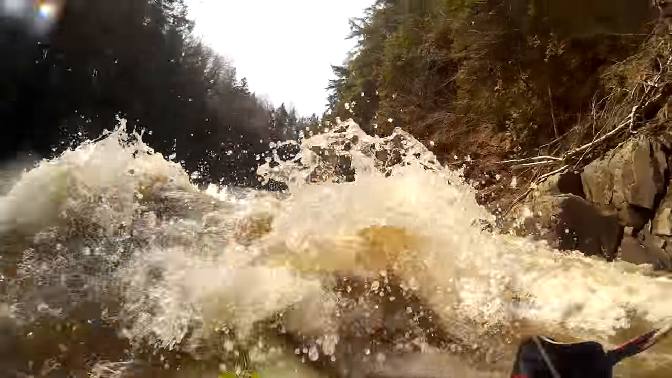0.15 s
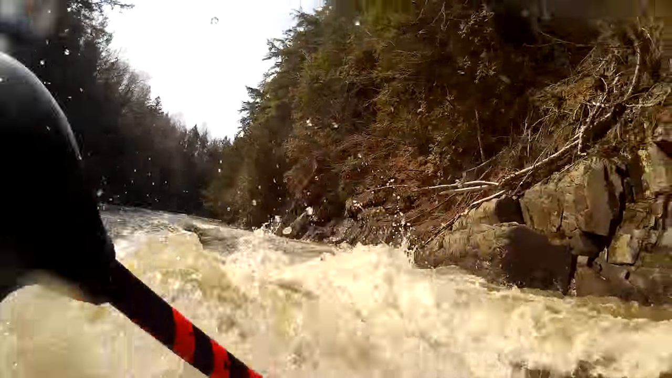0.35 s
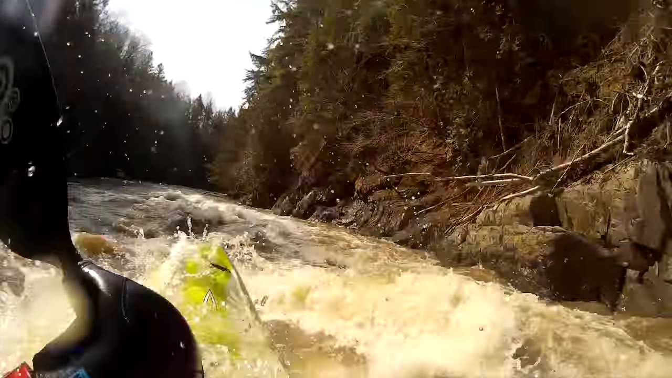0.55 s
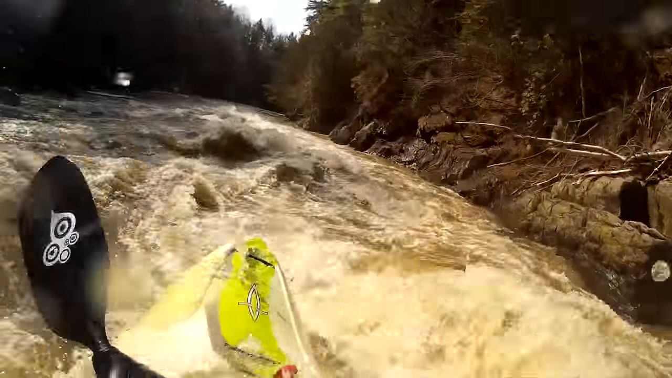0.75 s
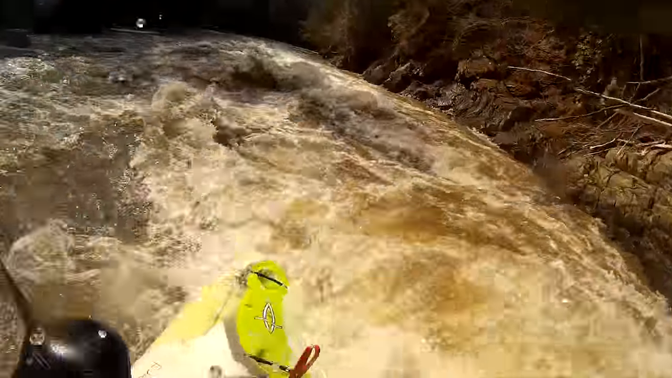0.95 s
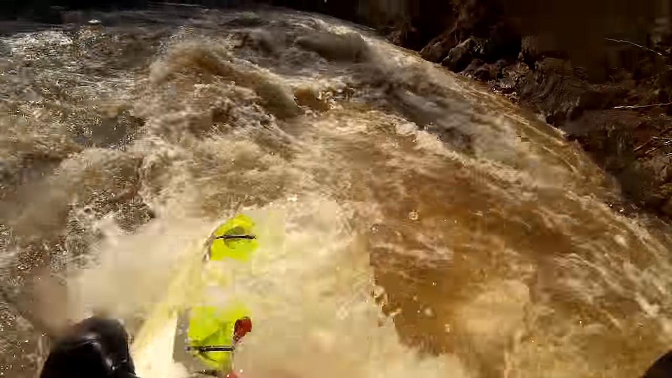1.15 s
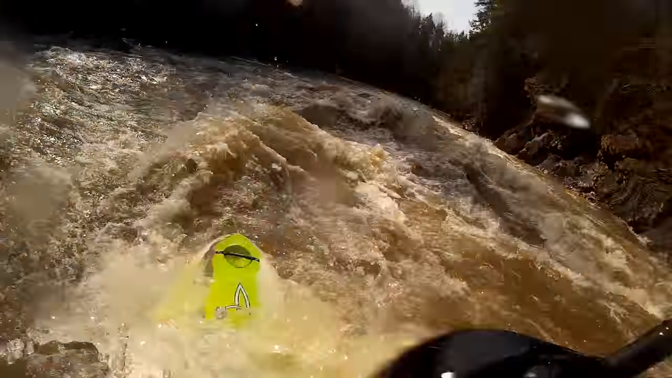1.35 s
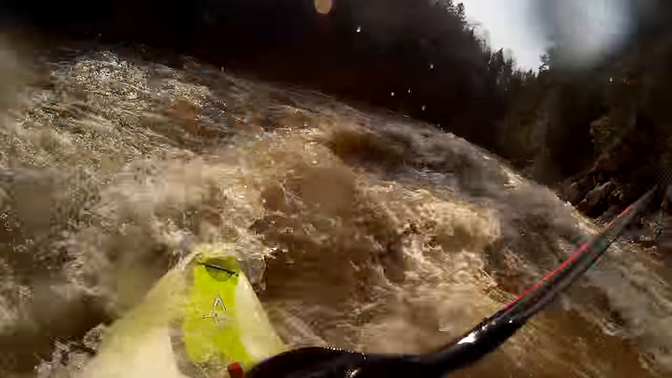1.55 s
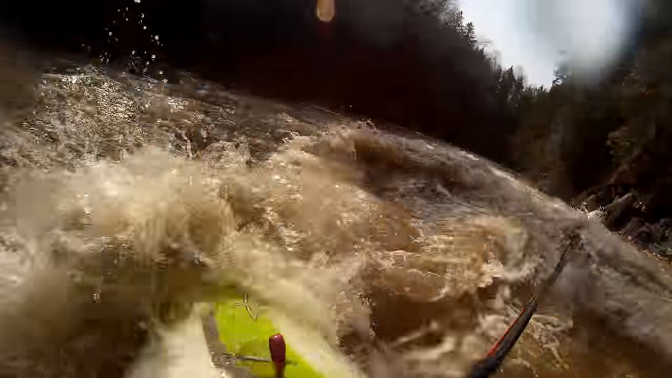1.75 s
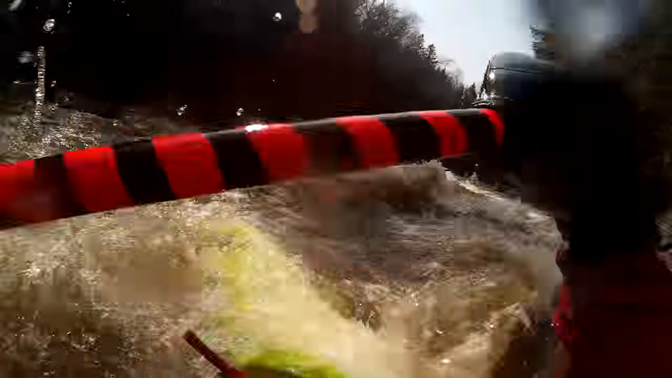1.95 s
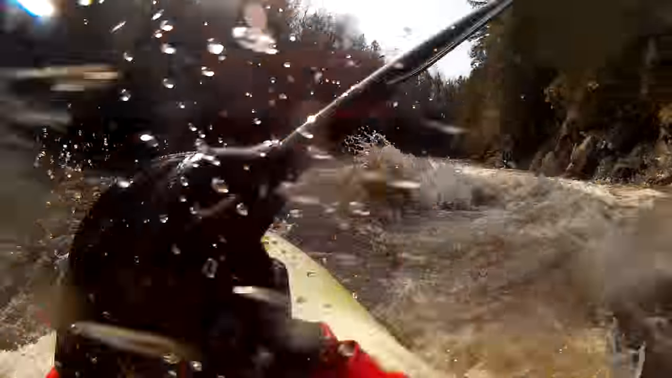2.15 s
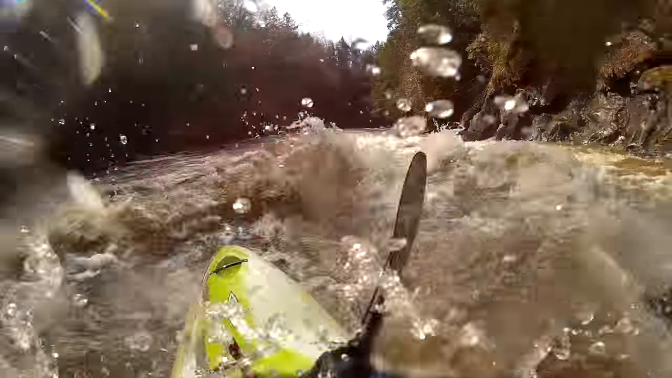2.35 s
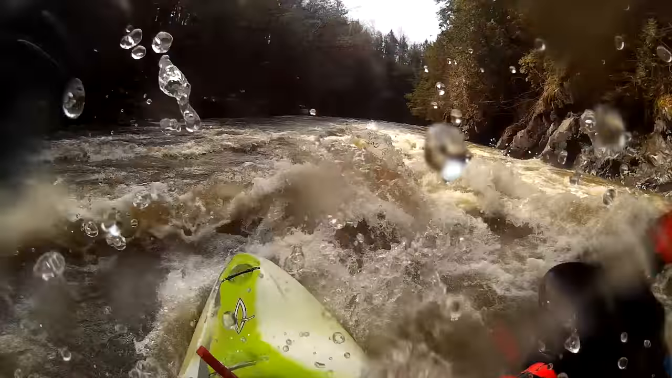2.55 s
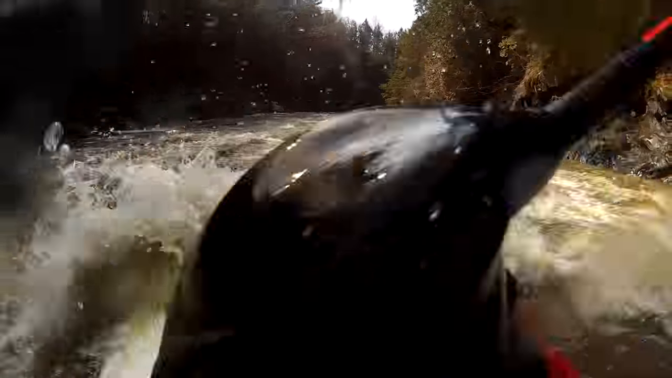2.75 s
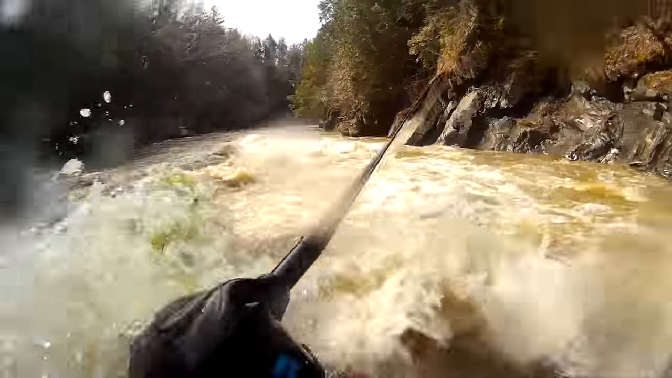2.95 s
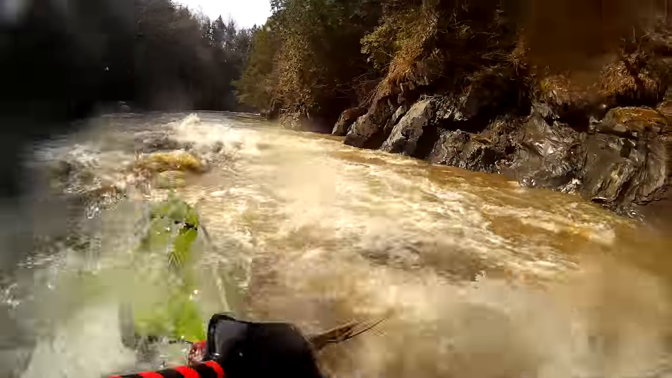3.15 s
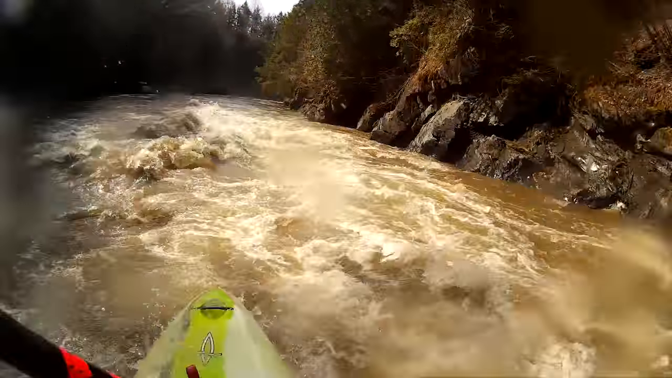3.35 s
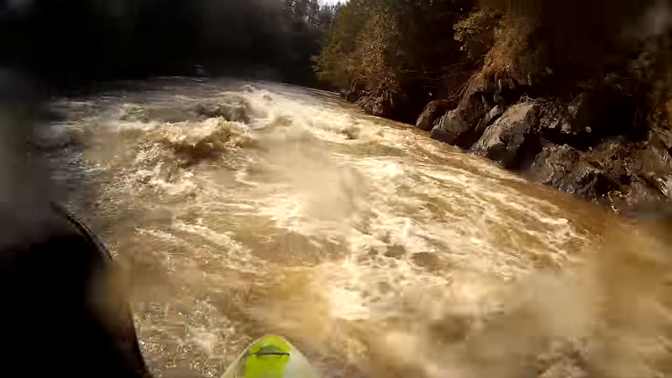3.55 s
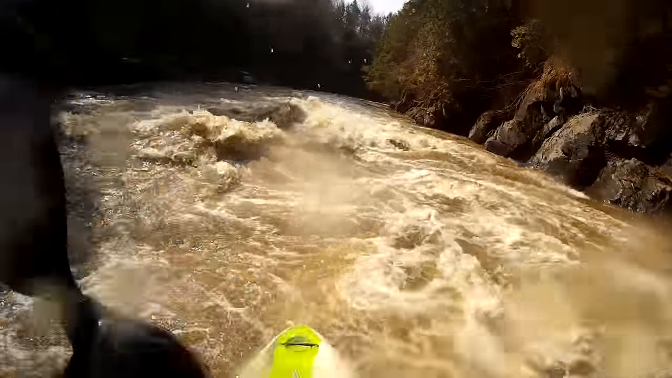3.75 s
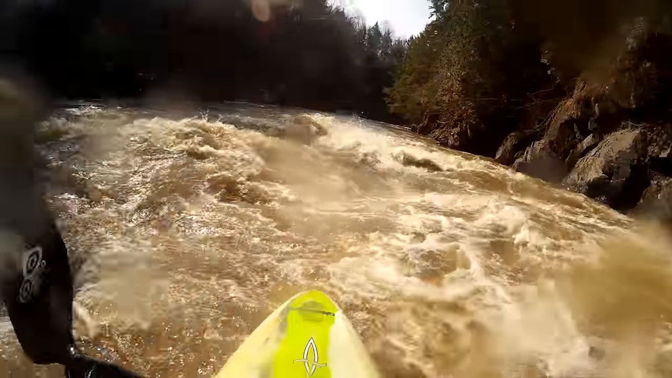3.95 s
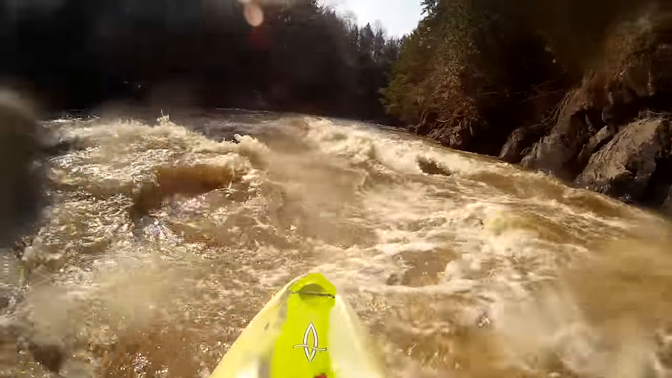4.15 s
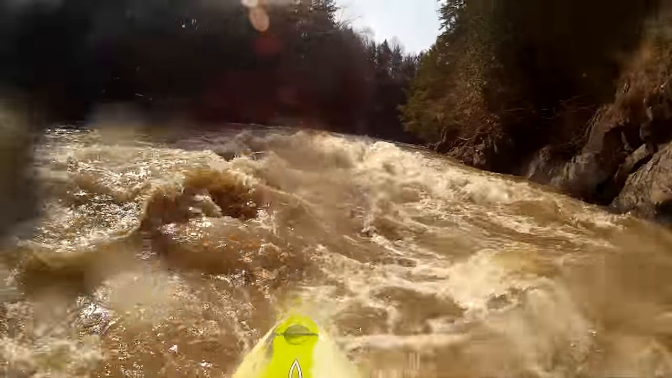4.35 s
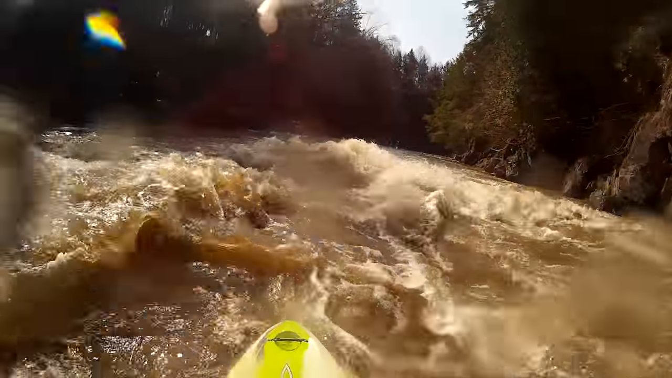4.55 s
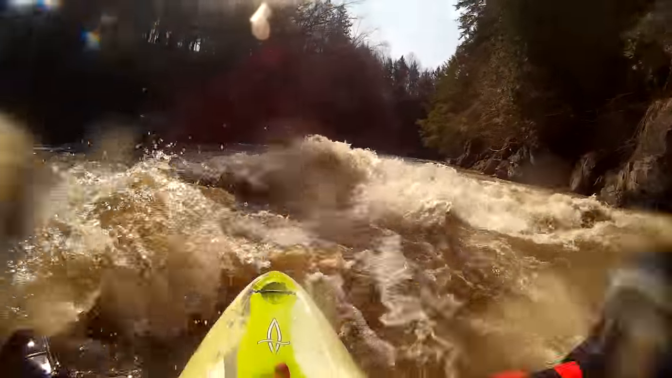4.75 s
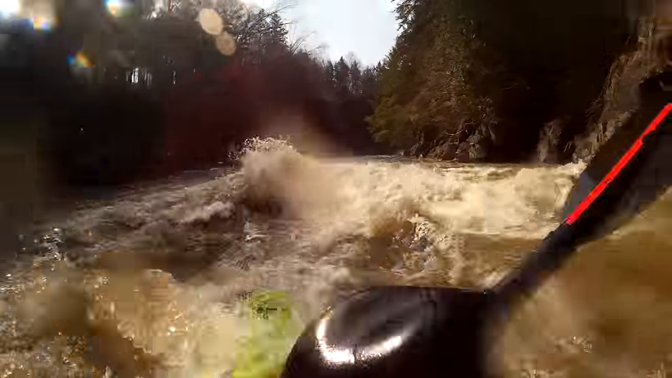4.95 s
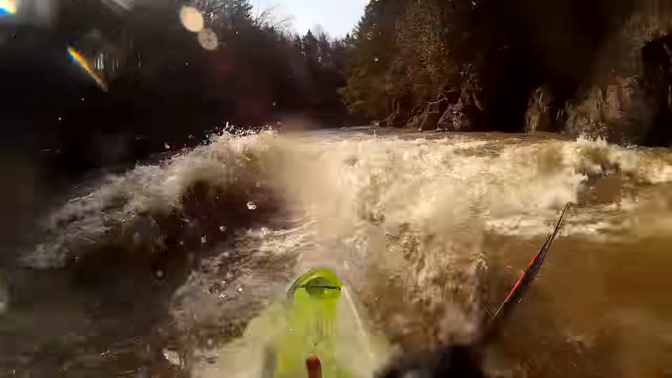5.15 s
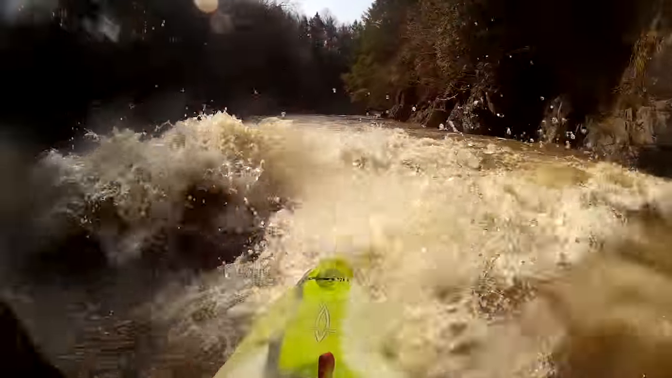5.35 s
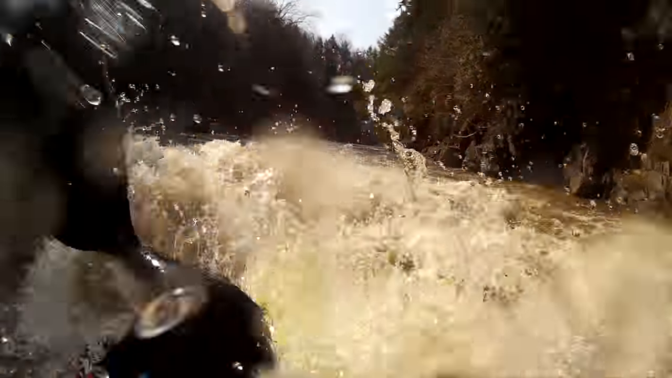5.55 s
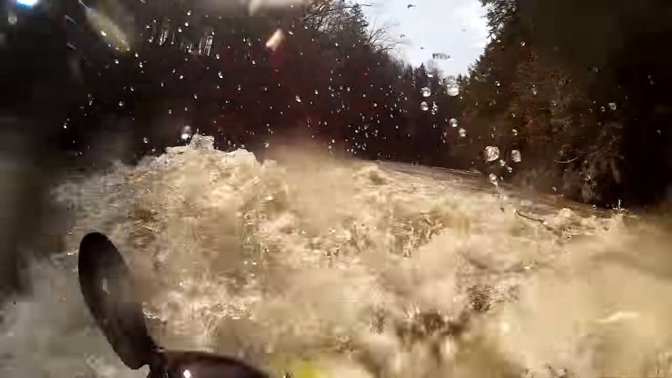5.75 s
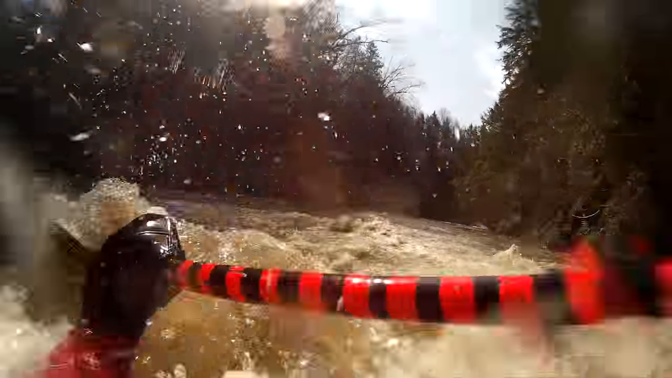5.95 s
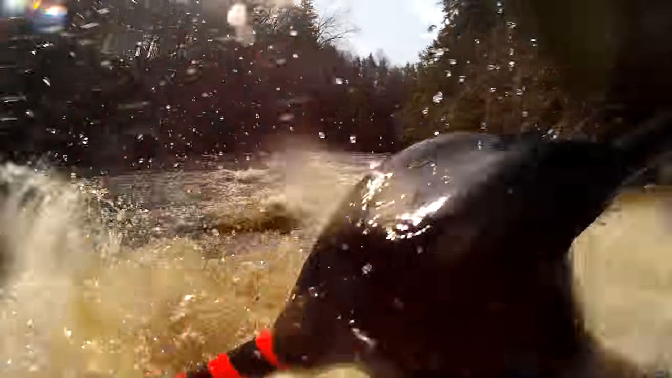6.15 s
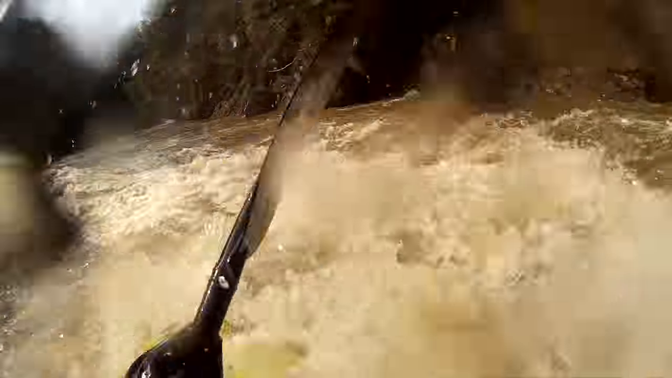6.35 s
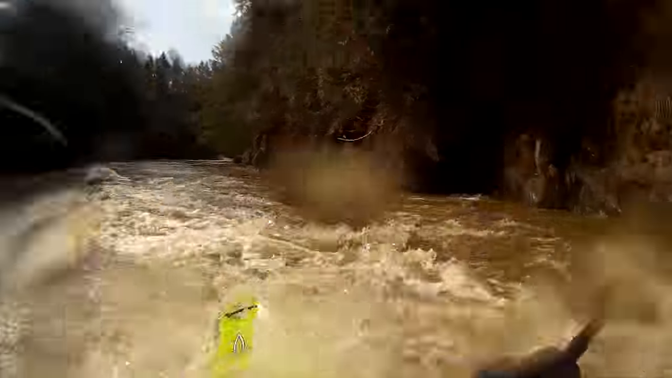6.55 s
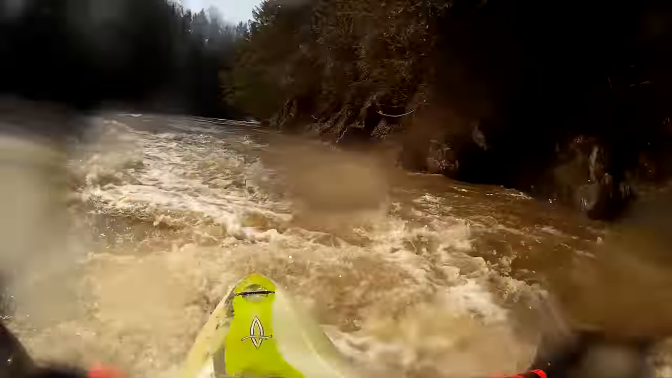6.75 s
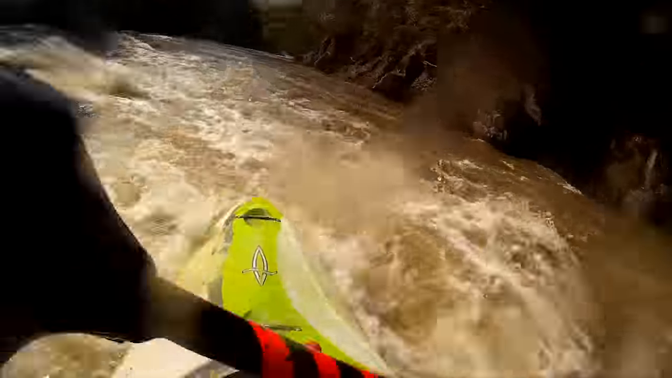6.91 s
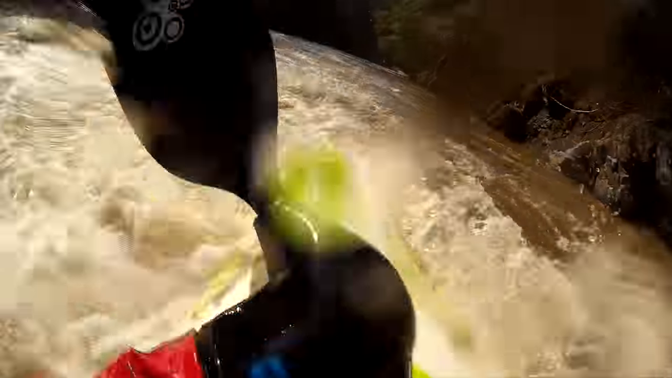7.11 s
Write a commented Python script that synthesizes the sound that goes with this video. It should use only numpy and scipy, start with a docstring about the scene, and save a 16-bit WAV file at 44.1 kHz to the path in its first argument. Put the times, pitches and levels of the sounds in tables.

```python
"""The muffled roar of river rapids, heard inside a sealed camera housing on a paddler's helmet.
Shaped noise makes the roar, spray, slosh, shaking and faint microphone hiss.
The mount creaks and thuds as it slips; knocks ring the housing's modes and push the mount.
Waves jolt helmet and camera into short bounces; drops crack, puff and ping on the shell."""
import sys
import numpy as np
from scipy import signal
from scipy.io import wavfile
from scipy.ndimage import uniform_filter1d

SR = 44100
rng = np.random.default_rng(int(sys.argv[2]) if len(sys.argv) > 2 else 0)


def int16_out(signal):
    """Quantize to a 16-bit WAV file."""
    q = np.round(np.clip(np.atleast_2d(signal).T, -1, 1) * 32767)
    wavfile.write(sys.argv[1], SR, q.astype(np.int16))


def amplitude_ratio(level_db):
    """Convert a level in decibels to the matching linear amplitude (field) ratio."""
    exponent = np.asarray(level_db, float) / 20
    return 10 ** exponent


N = 321048
TIME_S = np.arange(N) / SR


def evened(x):
    """Scales to rms 1."""
    return x / np.sqrt(np.mean(x ** 2) + 1e-20)


def density(points, hz):
    """Power density at hz, from a curve of (frequency [Hz], density [dB per Hz])."""
    f, db = np.transpose(points)
    curve_db = np.interp(np.log(hz + 1), np.log(f + 1), db, left=-80, right=-80)
    return amplitude_ratio(2 * curve_db)


def add(mix, start_s, sound):
    """Adds a sound to the mix at start_s, cut at the end of the mix."""
    part = mix[max(round(start_s * SR), 0):][:len(sound)]
    part += sound[:len(part)]


def ring(modes, low_hz, top_hz, weight_db=0):
    """Sums decaying modes struck by one soft tap, keeps low_hz to top_hz, scales to peak 1."""
    hz, width_hz, db = np.transpose(modes)
    t = np.arange(1500)[:, None] / SR
    decay = np.exp(-1.2 * np.pi * width_hz * t)
    tap = (amplitude_ratio(db + weight_db) * width_hz * decay * np.sin(2 * np.pi * hz * t)).sum(1)
    tap = signal.sosfilt(signal.butter(6, top_hz, fs=SR, output="sos"), tap)
    tap = signal.sosfilt(signal.butter(3, low_hz, "high", fs=SR, output="sos"), tap)
    return tap / abs(tap).max()


def noise(power, patchy_db=0, flicker_db=0):
    """Random short-time spectra of colour power(hz), with drifting patches and a shared flicker; rms 1."""
    frames, hz = N // 256 + 5, np.fft.rfftfreq(1024, 1 / SR)
    real, imag, patches = rng.standard_normal((frames, 513, 3)).T
    patches = uniform_filter1d(patches, size=10, axis=0)  # across frequency
    patches = evened(uniform_filter1d(patches, size=10, axis=1))  # across time
    flicker = evened(uniform_filter1d(rng.standard_normal(frames), size=3))
    gain = amplitude_ratio(patchy_db * patches + flicker_db * flicker)
    spectra = (real + 1j * imag) * np.sqrt(power(hz))[:, None] * gain
    return evened(signal.istft(spectra, nperseg=1024, noverlap=768)[1][:N])


def patter(per_s, spread_db):
    """Sparse taps at random moments, of random sign and uneven size."""
    chance, size, side = rng.random((N, 3)).T
    size_db = spread_db * np.minimum(-np.log(size + 1e-9), 5)
    return (chance < per_s / SR) * amplitude_ratio(size_db) * np.sign(side - .5)


# microphone self-noise, relative spectrum: (frequency [Hz], density [dB per Hz])
HISS_SPECTRUM = [(3240, -15), (5500, 0), (8160, -0.5), (14400, -0.5), (15500, 0)]
HISS_RMS_DB = -75.5


def microphone_hiss():
    """Steady coloured noise of the microphone itself."""
    spectrum = [(300, -22)] + HISS_SPECTRUM
    return amplitude_ratio(HISS_RMS_DB) * noise(lambda hz: density(spectrum, hz))


# river over time: (time [s], roar of nearby water [dB], jostling of boat and paddler [dB])
RIVER_LEVELS = [(0, -54, -59), (.25, -49.5, -50.5), (.38, -50, -55.5), (.56, -43.5, -46), (.64, -52, -54),
                (.95, -52, -55.5), (1.5, -52, -53.5), (2.22, -52, -51), (2.29, -58.5, -58),
                (2.39, -53.5, -50), (2.5, -55.5, -58.5), (2.6, -52, -54), (3.04, -56, -58.5),
                (3.3, -54, -58), (3.7, -58, -61.5), (4.07, -58.5, -59), (4.76, -55.5, -60),
                (5.01, -53.5, -56), (5.54, -52, -54), (6.2, -46.5, -47), (6.4, -48.5, -47.5),
                (6.57, -53.5, -54), (7.28, -57, -56.5)]


def river_levels():
    """Interpolates the roar and jostle levels [dB] over the scene."""
    s, roar_db, jostle_db = np.transpose(RIVER_LEVELS)
    return np.interp(TIME_S, s, roar_db), np.interp(TIME_S, s, jostle_db)


# water thrown over the housing: (peak time [s], half length [s], roar [dB], spray [dB])
WATER_SHEETS = [(0.3, 0.049, -50.5, -66), (0.325, .012, -47, -62), (0.472, 0.052, -47.5, -61),
                (1.196, 0.052, -54, -69), (1.7, 0.052, -52, -66), (2.038, 0.029, -45, -64),
                (2.147, 0.021, -47, -74), (2.213, 0.02, -47.5, -78), (2.493, .04, -55, -65.5),
                (3.155, 0.068, -55, -68), (5.33, 0.071, -69, -75), (5.7, 0.13, -55, -69),
                (5.86, 0.083, -53, -67), (6.08, 0.059, -55, -66.5), (6.26, 0.018, -62, -74)]


def thrown_water():
    """Powers of roar and spray from sheets of water, each a bell-shaped swell."""
    roar_power, spray_power = np.zeros(N), np.zeros(N)
    for peak_s, half_s, roar_db, spray_db in WATER_SHEETS:
        swell = np.exp(-2 * ((TIME_S - peak_s) / half_s) ** 2)
        roar_power += amplitude_ratio(2 * roar_db) * swell
        spray_power += amplitude_ratio(2 * spray_db) * swell
    return roar_power, spray_power


# low slosh, relative spectrum: (frequency [Hz], density [dB per Hz])
SLOSH_SPECTRUM = [(110, -9), (170, -3.5), (250, -0.5), (350, -2.5), (500, -6), (800, -6.5), (1000, -19.5)]


def slosh(jostle_db):
    """Low patchy noise that follows the jostling of boat and paddler."""
    return amplitude_ratio(jostle_db) * noise(lambda hz: density(SLOSH_SPECTRUM, hz), patchy_db=2.3, flicker_db=2.0)


# helmet shaking, relative spectrum: (frequency [Hz], density [dB per Hz])
SHAKING_SPECTRUM = [(12, -4), (25, 0), (40, -7.5), (65, -17.5), (105, -12), (140, -13.5), (200, -37)]
SHAKE_DB, SHAKE_DB_PER_DB = -57, 1.52  # level at -55 dB jostling, gain per dB of jostling
AFTERSHAKE_DB, AFTERSHAKE_RISE_S, AFTERSHAKE_DECAY_S = -17, 0.0079, 0.072  # dB relative to the jolt


def helmet_shaking(jostle_db):
    """Very low noise that follows the jostling and swells, then decays, after each jolt."""
    power = amplitude_ratio(2 * (SHAKE_DB + SHAKE_DB_PER_DB * (jostle_db + 55)))
    for start_s, db, _, _ in HELMET_JOLTS:
        since_s = np.maximum(TIME_S - start_s, 0)
        swell = (1 - np.exp(-since_s / AFTERSHAKE_RISE_S)) * np.exp(-since_s / AFTERSHAKE_DECAY_S)
        power += (amplitude_ratio(db + AFTERSHAKE_DB) * swell) ** 2
    shaking = noise(lambda hz: density(SHAKING_SPECTRUM, hz), patchy_db=0.84, flicker_db=3.1)
    return np.sqrt(power) * shaking


# spray, relative spectrum: (frequency [Hz], density [dB per Hz])
SPRAY_SPECTRUM = [(2800, -19), (3300, -7.5), (3850, 1), (4300, -4), (4800, -12), (6000, -18.5),
                  (9000, -20.5), (13000, -29)]
SPRAY_DB, SPRAY_DB_PER_DB = -69.5, 0.97  # level at -52 dB roar, gain per dB of roar


def spray(roar_db, sheet_power):
    """Treble noise that follows the roar and the thrown water."""
    power = amplitude_ratio(2 * (SPRAY_DB + SPRAY_DB_PER_DB * (roar_db + 52))) + sheet_power
    return np.sqrt(power) * noise(lambda hz: density(SPRAY_SPECTRUM, hz), patchy_db=.9, flicker_db=.6)


# housing resonances: (frequency [Hz], width [Hz], relative level [dB])
HOUSING_MODES = [(1160, 14, 3.5), (1310, 134, -0.5), (1500, 100, 2), (1684, 510, -3), (2150, 140, -4),
                 (2450, 120, -25)]
# broad leak through the walls, relative spectrum: (frequency [Hz], density [dB per Hz])
WALL_LEAK = [(700, -16), (950, -2), (1900, -9.5), (2300, -8.5), (2700, -17.5), (3200, -26)]


def roar(roar_db, sheet_power):
    """Water noise through walls and housing resonances, with a patter of splashes ringing the modes."""
    def muffled(hz):
        """Power of the resonance peaks plus the wall leak."""
        peaks = sum(amplitude_ratio(2 * db) / (1 + (2 * (hz - mode_hz) / width_hz) ** 2) ** 1.68
                    for mode_hz, width_hz, db in HOUSING_MODES)
        return peaks + density(WALL_LEAK, hz)

    rush = noise(muffled, patchy_db=1.5, flicker_db=1.03)
    splash = ring(HOUSING_MODES, low_hz=790, top_hz=2000)
    splashes = evened(signal.oaconvolve(patter(per_s=260, spread_db=0.5), splash)[:N])
    return np.sqrt(amplitude_ratio(2 * roar_db) + sheet_power) * (rush + amplitude_ratio(-9) * splashes)


def river():
    """Sums slosh, shaking, spray and roar, all driven by the same river levels."""
    roar_db, jostle_db = river_levels()
    sheet_roar, sheet_spray = thrown_water()
    low = slosh(jostle_db) + helmet_shaking(jostle_db)
    return low + spray(roar_db, sheet_spray) + roar(roar_db, sheet_roar)


# drops on the shell: (time [s], ping [dB], ping start [Hz], puff [dB], puff length [s])
SHELL_DROPS = [(.323, -47, 3700, -54, .003), (.528, -53, 3900, -48, .003), (1.173, -48.5, 3640, -54, .003),
               (1.204, -54, 3670, -66, .003), (1.228, -51, 3640, -56, .003), (2.035, -62, 6000, -57, .01),
               (2.138, -32, 2150, -47, .008), (2.204, -54, 7700, -47.5, .007),
               (2.221, -44, 2000, -49, .007), (2.503, -41, 2350, -66, .004), (2.514, -40, 2230, -63, .004),
               (3.213, -52, 1800, -55.5, .003), (5.605, -37.5, 2280, -50, 0.0062),
               (5.934, -48, 3550, -66, .003), (6.177, -42, 2620, -49.5, .004),
               (6.223, -42, 2410, -60, .003), (6.264, -47, 4640, -46, 0.0045),
               (6.27, -63, 8200, -53.5, .005), (6.352, -46, 2300, -52, .003)]
# puff of a drop, relative spectrum: (frequency [Hz], density [dB per Hz])
PUFF_SPECTRUM = [(1500, -10), (2500, 8.5), (3200, 3), (4400, 8.5), (6000, -4), (8500, -4), (11500, -19),
                 (15000, -23)]
HARD_S = .004  # puff length at which the crack has its nominal strength; shorter is harder, longer is softer


def drops():
    """A drop cracks on the shell and bursts as a short puff of hiss with a rising ping."""
    out, t = np.zeros(N), np.arange(700) / SR
    hiss = noise(lambda hz: density(PUFF_SPECTRUM, hz))
    fade = 1 - t / t[-1]
    shell = ring(HOUSING_MODES, low_hz=700, top_hz=6100)[:len(t)] * fade ** 2
    click = np.sin(2 * np.pi * 4000 * t) * np.exp(-t / 0.00028)
    crack = amplitude_ratio(10.0) * shell + amplitude_ratio(8) * click
    for start_s, ping_db, ping_hz, puff_db, puff_s in SHELL_DROPS:
        u = t / puff_s
        puff = hiss[int(start_s * SR):][:len(t)] * np.minimum(u * 4, 1) * np.exp(-u ** 2) * fade
        ping_swell = np.exp(1 - t / 0.00085) * t / 0.00074  # peaks 1.2 dB above 1
        ping = np.sin(2 * np.pi * ping_hz * t * (1 + 8 * t)) * ping_swell
        burst = puff + crack * HARD_S / puff_s
        add(out, start_s, amplitude_ratio(puff_db) * burst + amplitude_ratio(ping_db) * ping)
    return out


# jolts of helmet (slow) or camera (quick): (time [s], level [dB], bounce [Hz], ring length [s])
HELMET_JOLTS = [(0.453, -35.5, 25, 0.054), (0.578, -23, 33.5, 0.035), (0.674, -36.5, 29, 0.061),
                (0.854, -43, 105, 0.041), (1.068, -42.5, 30, 0.051), (1.156, -33.5, 25.3, 0.02),
                (1.313, -43.5, 25, 0.082), (1.528, -40, 30, 0.036), (1.581, -33, 32.7, .038),
                (1.913, -35.5, 66, .013), (1.996, -32, 95, 0.037), (2.057, -24.5, 35, 0.034),
                (2.154, -21, 35.8, .027), (2.247, -22, 33.6, 0.031), (2.967, -47.5, 110, 0.045),
                (3.114, -47.5, 30, 0.047), (3.255, -44, 115.6, .05), (3.455, -40, 113, 0.021),
                (3.498, -48, 28, 0.054), (3.872, -46, 109, .037), (3.999, -48.5, 113, 0.049),
                (5.006, -45, 96, 0.033), (5.09, -48.5, 111, 0.048), (5.521, -39.5, 112, 0.022),
                (5.604, -32, 118, 0.0097), (5.977, -34, 31, 0.04), (6.08, -43, 85, 0.058),
                (6.15, -33.5, 98, 0.015), (6.342, -32, 67.6, 0.017), (6.437, -40.5, 100, .034),
                (6.548, -25.5, 32.4, 0.045), (6.628, -39, 25, 0.052), (7.007, -36.5, 109, 0.048)]
HELMET_UNDER_HZ = 50


def jolts():
    """A quick first swing, then one or a few slower bounces that stop short."""
    out, t = np.zeros(N), np.arange(8000) / SR
    for start_s, db, hz, length_s in HELMET_JOLTS:
        way = np.sign(hz - HELMET_UNDER_HZ)  # helmet first pulls, camera first pushes
        phase = 2 * np.pi * hz * t + 2.0 * (1 - np.exp(-9 * hz * t))
        onset = 1 - np.exp(-(t / 0.0015) ** 2)
        swing = np.sin(phase) * np.exp(-(t / length_s) ** 3.9) * onset
        add(out, start_s, way * amplitude_ratio(db) * swing)
    return out


# mount creaks and single thuds:
# (time [s], length [s], mean slip rate [1/s], thud rms [dB], ring over thud [dB])
MOUNT_CREAKS = [(.095, .032, 220, -44, -7), (0.143, 0.02, 303, -41, -7.5), (0.185, 0.015, 160, -48, -3),
                (0.234, 0.018, 250, -55, 0), (0.268, 0.018, 250, -45, -4), (.425, .033, 207, -39, -12),
                (0.502, 0.016, 242, -36.5, -10), (0.578, .015, 210, -36, -6),
                (0.605, 0.0079, 220, -43, -14), (0.642, .013, 208, -40, -10), (0.676, .013, 250, -44, -3),
                (0.737, 0.023, 264, -42, -6.5), (.861, 0.018, 185, -49.5, 0), (1.027, 0.024, 286, -48, -5),
                (1.079, 0.013, 310, -48, 0), (1.105, 0.046, 283, -50, 3.5), (1.212, .021, 260, -51, -16),
                (1.247, 0.017, 270, -53, -14), (1.371, 0.041, 203, -44.5, -5),
                (1.44, 0.02, 267, -41.5, -6.5), (1.482, 0.019, 252, -40, -12), (1.585, .009, 250, -40, -6),
                (1.61, .014, 370, -46, -7), (1.652, 0.018, 290, -42.5, -11), (1.761, 0.018, 310, -44, -6),
                (1.812, 0.0095, 200, -40, -6), (1.854, 0.02, 275, -44, -5), (1.96, 0.016, 240, -37, -22),
                (2.001, 0.025, 263, -41.5, -6), (2.133, .041, 240, -45, -8), (2.324, 0.022, 260, -48.5, -7),
                (2.454, 0.016, 204, -45.5, -4.5), (2.549, .032, 238, -41, -7.5),
                (2.607, 0.012, 250, -45, -3), (2.698, 0.0094, 240, -47.5, -8),
                (2.721, 0.019, 200, -53.5, 2), (2.852, 0.036, 177, -51.5, 0), (2.962, .02, 290, -56, -13),
                (3.017, 0.033, 158, -47, -3), (3.065, .025, 240, -45.5, -8), (3.259, 0.056, 201, -44, -6),
                (3.462, 0.033, 199, -42.5, -6), (3.877, 0.02, 300, -52.5, -14),
                (4.002, 0.0089, 190, -48, 0.5), (5.006, 0.021, 200, -49.5, -2),
                (5.115, 0.028, 263, -44.5, -11), (5.164, 0.017, 204, -43.5, -5),
                (5.27, 0.011, 190, -49, -10), (5.311, 0.0084, 260, -52, -5), (5.447, 0.036, 186, -45, -1.5),
                (5.494, 0.011, 260, -45.5, -12), (5.603, 0.0042, 230, -31, -13),
                (5.772, 0.015, 237, -36.5, -7.5), (5.922, 0.016, 215, -42, -8),
                (5.946, 0.012, 250, -39, -6), (6.016, 0.0094, 240, -40, -6), (6.049, 0.012, 250, -41.5, -4),
                (6.139, .006, 250, -41.5, 0), (6.278, 0.035, 200, -46.5, 1.5),
                (6.543, 0.013, 220, -40.5, 0), (6.703, 0.024, 180, -46, -3),
                (6.816, 0.041, 200, -40.5, -10), (6.896, 0.019, 256, -46, -14),
                (6.991, .026, 214, -44, 0.5), (7.154, 0.02, 240, -48, -12), (7.214, 0.036, 225, -47.5, -9)]
# mount resonances: (frequency [Hz], width [Hz], relative level [dB])
MOUNT_MODES = [(247, 81, 2.5), (348.6, 73, 3.5), (450, 350, -11.5), (599, 210, -5)]
SLIP_ARCH = .12  # slips come quickest in the middle of a creak


def creaks():
    """The mount slips once or in an uneven train; each slip thuds in the mount and rings the housing."""
    out = np.zeros(N)
    thud = ring(MOUNT_MODES, low_hz=123, top_hz=770)
    bright = ring(HOUSING_MODES, low_hz=1000, top_hz=1640)
    luck = rng.standard_normal((len(MOUNT_CREAKS), 3, 24))
    for (start_s, length_s, per_s, db, ring_db), (late, strong, sharp) in zip(MOUNT_CREAKS, luck):
        slip_s = (np.arange(24) + .03 * late) / per_s
        turn = 2 * np.pi * np.minimum(slip_s / length_s, 1)
        slip_s = slip_s + SLIP_ARCH * length_s / (2 * np.pi) * np.sin(turn)
        used = slip_s < length_s
        where = np.clip(slip_s[used] * SR, 0, None).astype(int)
        fade = 1 - .5 * (slip_s[used] / length_s) ** 2
        slips, taps, n = np.zeros(4000), np.zeros(4000), int(length_s * SR)
        slips[where] = fade * amplitude_ratio(1.2 * strong[used])
        taps[where] = fade * amplitude_ratio(3.0 * sharp[used])
        low, high = signal.oaconvolve(slips, thud), signal.oaconvolve(taps, bright)
        creak = low / low[:n].std() + amplitude_ratio(ring_db) * high / high[:n].std()
        add(out, start_s, np.sign(late[-1]) * amplitude_ratio(db) * creak)
    return out


# knocks on the housing: (time [s], ring peak [dB], strongest ring [Hz], mount thud peak [dB])
HOUSING_KNOCKS = [(.0952, -37, 1470, -36.5), (.186, -36, 1170, -44), (0.2675, -40, 1500, -45),
                  (0.3509, -34, 1420, -36), (0.45, -38, 1160, -40), (0.539, -38, 1140, -32),
                  (0.5812, -22, 1360, -37), (0.6398, -37.5, 1400, -40), (0.6707, -34, 1480, -41),
                  (0.839, -40, 1340, -39.5), (0.8654, -37, 1550, -45), (0.875, -34, 1220, -52),
                  (1.1244, -32, 1270, -37), (1.1403, -25.5, 1270, -29.5), (1.1541, -29, 1280, -56),
                  (1.5839, -26, 1200, -35), (1.6215, -35, 1500, -36), (1.652, -34, 1210, -30),
                  (1.6597, -28.5, 1280, -28.5), (1.7756, -37, 1160, -31), (1.8659, -24.5, 1470, -40),
                  (1.8947, -32.5, 1470, -54), (1.917, -34, 1470, -34.5), (1.9629, -27, 1340, -46),
                  (2.0084, -29, 1460, -48), (2.0162, -23.5, 1500, -41), (2.0595, -31, 1500, -31.5),
                  (2.0944, -32, 1300, -49), (2.138, -28, 1230, -44), (2.2506, -28, 1340, -40),
                  (2.3562, -36.5, 1510, -36), (2.4284, -39.5, 1270, -34.5), (2.553, -32, 1460, -32.5),
                  (2.6982, -37.5, 1320, -39), (2.8729, -34.5, 1300, -38), (2.9725, -36.5, 1260, -37),
                  (3.017, -37, 1490, -38), (3.0849, -36, 1460, -37.5), (3.224, -45, 1460, -38),
                  (3.2568, -41, 1270, -31), (3.265, -32, 1310, -40), (3.2905, -34, 1460, -34.5),
                  (3.301, -32.5, 1370, -37.5), (3.3391, -49, 1480, -40), (3.8772, -30.5, 1380, -37.5),
                  (5.009, -46, 1360, -37.5), (5.017, -32, 1190, -39), (5.093, -29, 1420, -30.5),
                  (5.1714, -36, 1410, -40), (5.2577, -35.5, 1270, -40), (5.3274, -43, 1500, -40),
                  (5.5223, -31, 1330, -42), (5.6049, -24.5, 1640, -55), (5.633, -34.5, 1220, -33.5),
                  (5.6778, -37, 1570, -41), (5.7734, -32, 1200, -46), (5.9436, -31.5, 1530, -43),
                  (6.003, -28, 1410, -41), (6.0858, -26, 1280, -32), (6.1507, -26.5, 1510, -48),
                  (6.1741, -18.5, 1760, -40), (6.2, -29, 1160, -34), (6.2225, -32, 1230, -40),
                  (6.2618, -27.5, 1780, -48), (6.2884, -35, 1420, -36), (6.339, -29, 1200, -35),
                  (6.359, -27.5, 1210, -56), (6.3899, -31, 1470, -50), (6.4223, -26.5, 1300, -41),
                  (6.437, -22.5, 1320, -34), (6.4798, -26.5, 1310, -36), (6.5495, -28.5, 1200, -32),
                  (6.701, -33, 1240, -49), (6.994, -25.5, 1490, -31.5), (7.0116, -28, 1500, -41),
                  (7.1542, -37, 1390, -52)]
RATTLE_S = 0.004974


def knocks():
    """One blow and a short rattle ring the modes near the struck pitch; the blow pushes the mount."""
    out, mode_hz = np.zeros(N), np.transpose(HOUSING_MODES)[0]
    thud = ring(MOUNT_MODES, low_hz=123, top_hz=780)
    luck = rng.random((len(HOUSING_KNOCKS), 2, 5))
    for (start_s, db, hz, thud_db), (late, size) in zip(HOUSING_KNOCKS, luck):
        way = np.sign(size[0] - .5)
        blows = np.zeros(1500)
        blows[np.clip(late * RATTLE_S * SR, 0, 1499).astype(int)] = size - .5
        blows[0] = way
        weight_db = -45 * abs(np.log2(mode_hz / hz))  # 45 dB down per octave away
        tap = ring(HOUSING_MODES, low_hz=0.64 * hz, top_hz=1.27 * hz, weight_db=weight_db)
        bright = signal.oaconvolve(blows, tap)
        add(out, start_s, amplitude_ratio(db) * bright / abs(bright).max())
        add(out, start_s, way * amplitude_ratio(thud_db) * thud)
    return out


def scene():
    """Sums everything that reaches the microphone inside the housing, as one channel."""
    return (river() + drops() + jolts() + creaks() + knocks())[None]


def low_pass(x):
    """Removes everything above the highest recorded frequency."""
    return signal.sosfilt(signal.butter(12, 15710, fs=SR, output="sos"), x)


def record(dry):
    """Adds the microphone's own hiss and finishes the mix."""
    mix = dry + microphone_hiss()
    return low_pass(mix)


dry = scene()
out = record(dry)
int16_out(out)
```